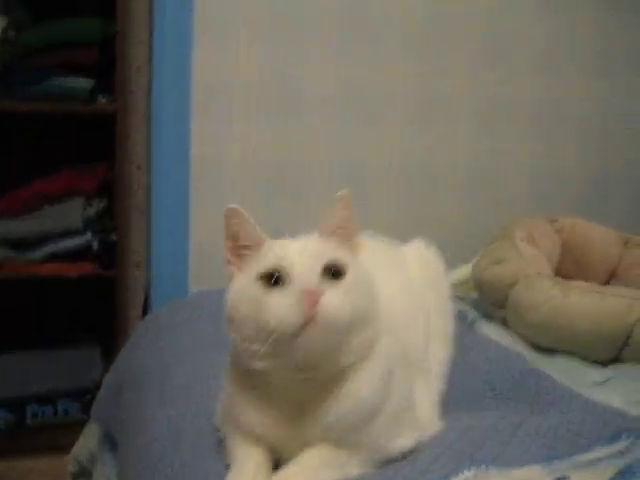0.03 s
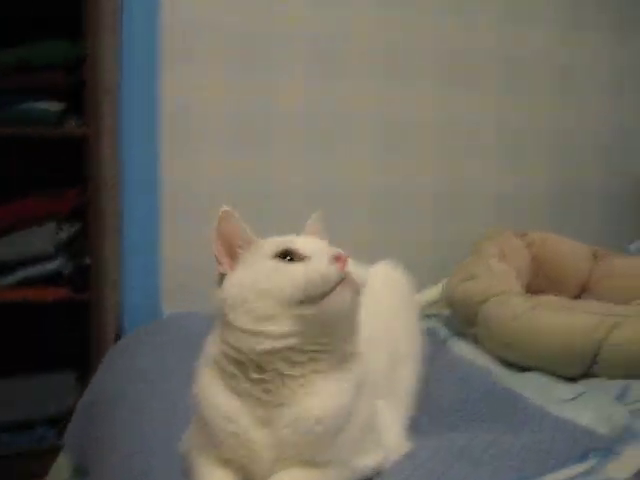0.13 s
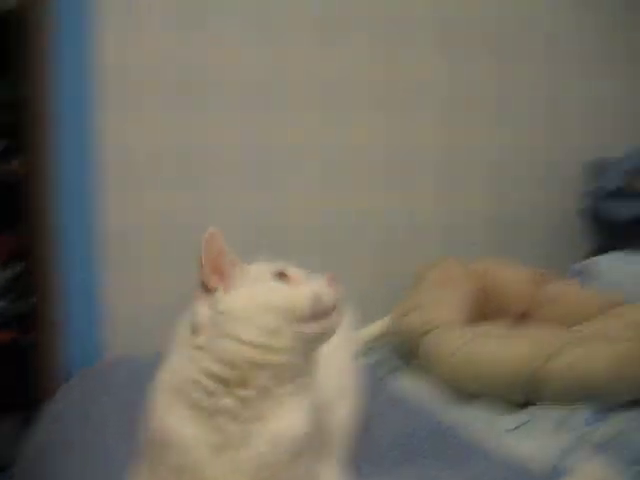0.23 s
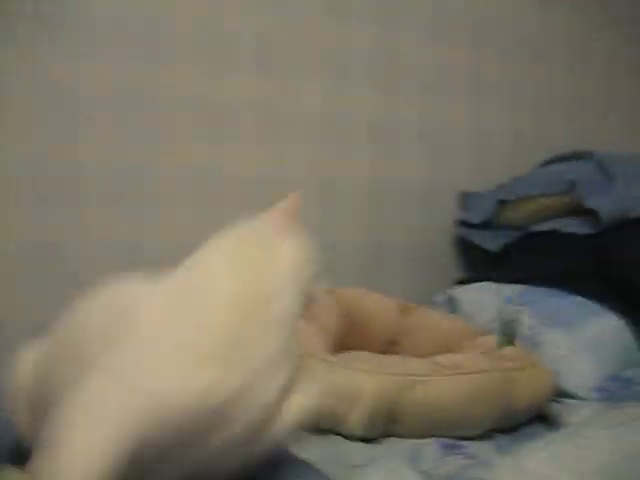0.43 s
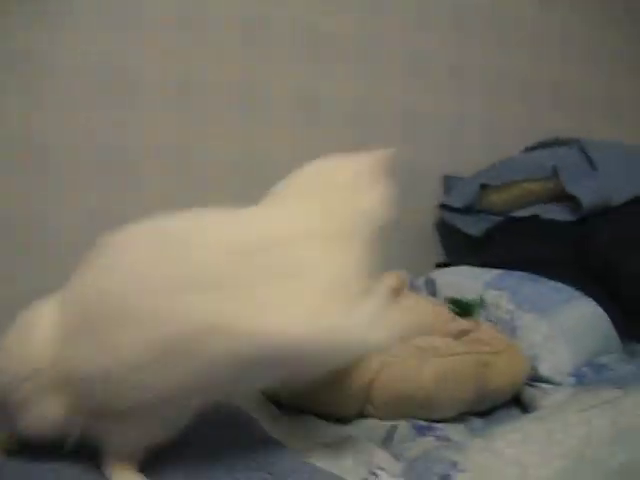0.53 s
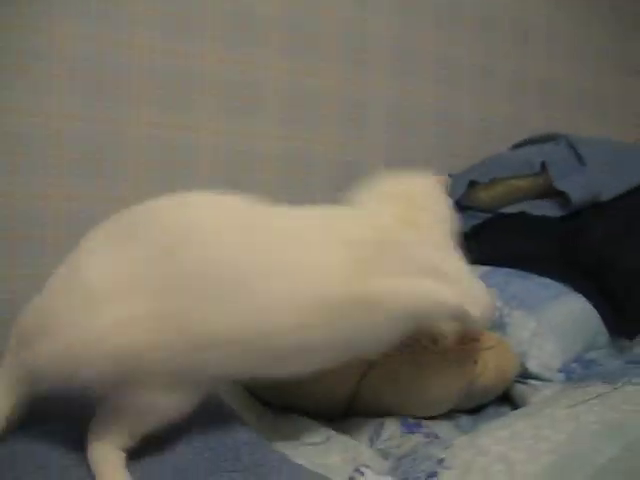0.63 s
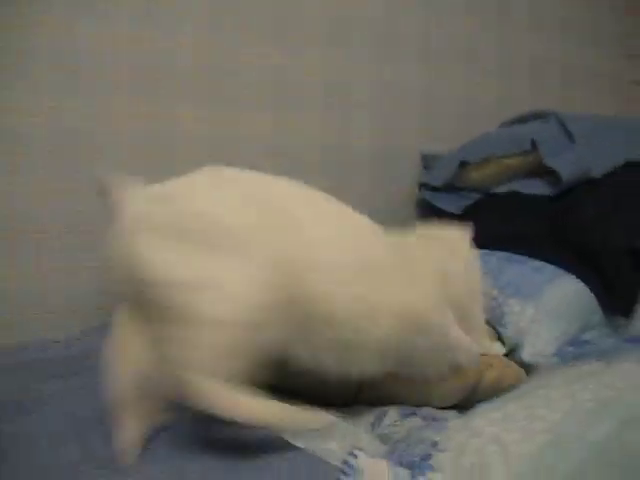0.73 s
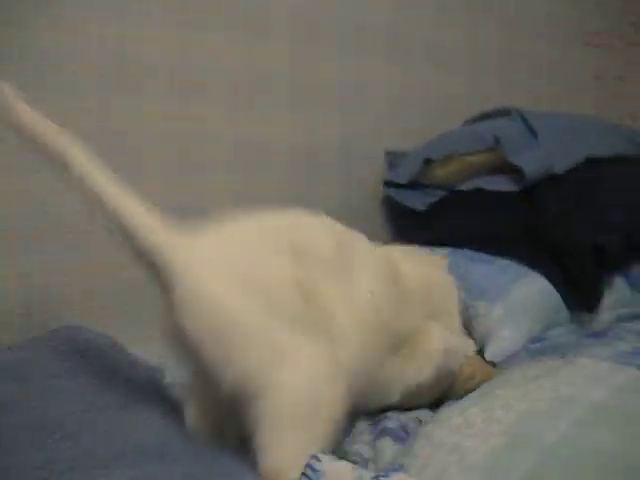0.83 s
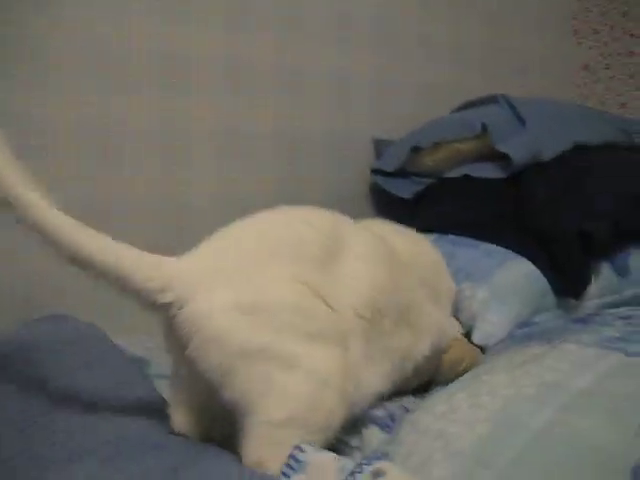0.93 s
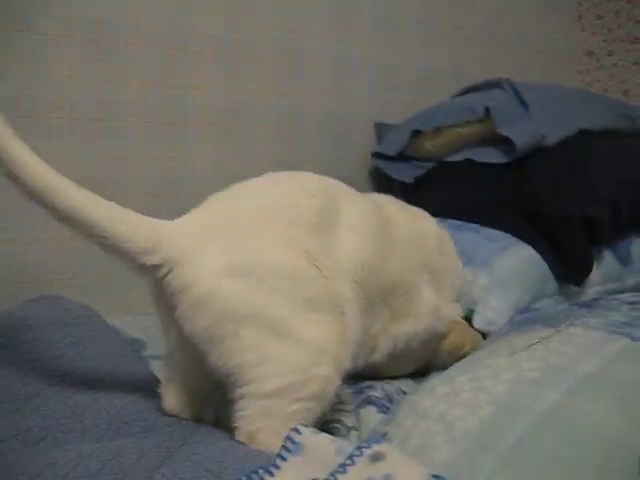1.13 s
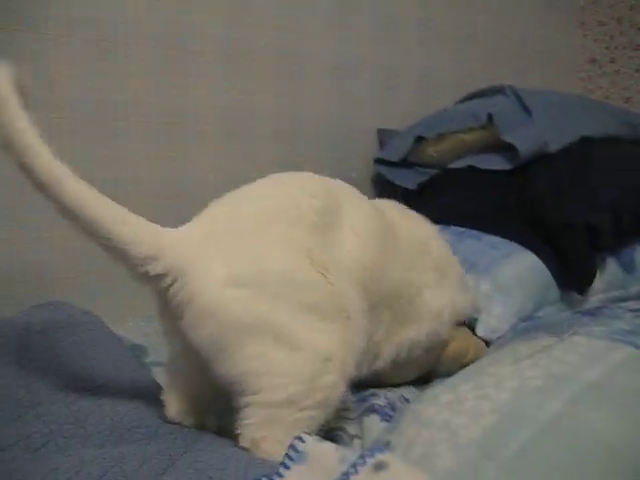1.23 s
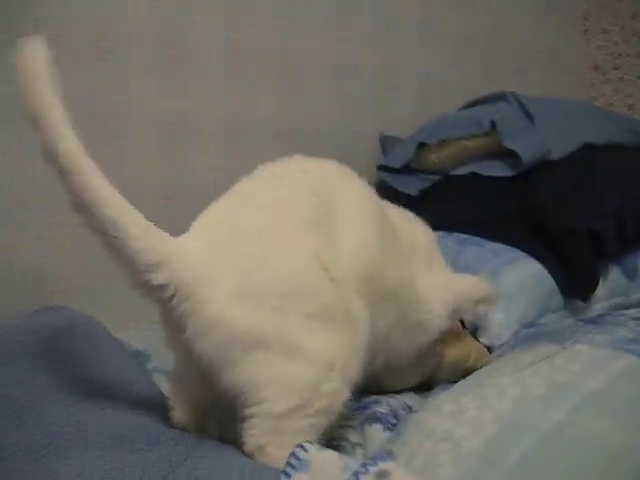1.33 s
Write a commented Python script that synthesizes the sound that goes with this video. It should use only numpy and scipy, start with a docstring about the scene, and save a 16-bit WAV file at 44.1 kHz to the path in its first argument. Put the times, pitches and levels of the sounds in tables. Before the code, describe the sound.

A cat gives a short, rasping trill at about 0.5 seconds, just after a sharp plastic click at 0.2. Its paws thump and rustle softly on bedding, mostly from 0.6 to 0.9 seconds. A second sharp click comes near 1 second, then a faint chirr around 1.3. Steady hiss, a faint high electrical whine and low handling rumble lie underneath in a quiet room.

```python
"""A cat pounces on a bed

A cat turns and pounces in a quiet room, and the bedding thumps and rustles under its paws.
Two sharp clicks ring a small plastic casing. Between them comes a short rasping chirr (a rough trill)
with a few hard catches; a faint chirr comes later. Under it all are a steady hiss, a faint electrical
whine and the low rumble of a hand-held camera following the cat."""
import sys
import numpy as np
from scipy import signal
from scipy.fft import rfft, irfft
from scipy.io import wavfile

SR = 44100
rng = np.random.default_rng(int(sys.argv[2]) if len(sys.argv) > 2 else 0)


def log_audio(samples):
    """Write samples as a 16-bit WAV file to the path given in sys.argv[1]."""
    # one column per channel
    frames = np.atleast_2d(samples).T
    # limit to full scale, then quantise
    limited = np.clip(frames, -1, 1)
    pcm = np.round(limited * 32767).astype(np.int16)
    wavfile.write(sys.argv[1], SR, pcm)


N = 61739

# Tone of the hiss, before its bass is thinned: pitch_hz, level_db
HISS_COLOUR = [(59, -49), (100, 2.5), (232, -6.5), (284, -9), (342, -11), (794, -12), (1020, -14.5),
               (1580, -13), (4000, -14.5), (4650, -13.5), (5600, -19), (7280, -33), (12300, -120)]
# Tones of the electrical whine at full strength: pitch_hz, level_db
WHINE_TONES = [(4702.5, -61.5), (4763, -63), (4822, -66)]
# Light brushes of cloth: peak_s, level_db, width_s, pitch_hz
CLOTH_BRUSHES = [(.01, -45, .033, 3300), (1.114, -52, .004, 2600), (1.19, -52, .018, 2250)]
# Paws and body landing on the bedding: peak_s, level_db, rise_s, fall_s, cutoff_hz
BED_THUMPS = [(0.219, -37.5, .003, 0.0054, 440), (.447, -44, 0.0097, 0.026, 200),
              (0.553, -41, 0.0025, 0.014, 80.7), (0.634, -34, 0.0053, 0.0035, 100),
              (0.674, -50.5, 0.054, 0.06, 486), (0.707, -38.5, 0.014, 0.017, 390),
              (0.761, -37.5, .015, 0.011, 256), (0.807, -35, 0.0064, 0.023, 162),
              (.838, -36, 0.036, 0.042, 237.6), (0.859, -47, 0.023, 0.041, 309)]
# The two clicks: start_s, level_db, pitch_factor, snap_db, tick_db, edge_db
CASING_CLICKS = [(0.2372, -1.1, 0.998, -14.5, -4, -3.5), (1.0451, -1.5, 1.0215, -9, -9, -12)]
# Small bounces after a click, before its pitch factor and level apply: delay_s, level_db, pitch_hz
CLICK_BOUNCES = [(.00312, -6.5, 1220), (.00571, -15.5, 1378), (.00986, -14.5, 1082)]
# Tones the casing rings with: pitch_hz, level_db, ring_s (time to fade by 60 dB)
CASING_TONES = [(685.6, -15.5, 0.036), (854, -12, 0.046), (1004, -15.5, 0.042), (1265, -29, 0.057),
                (1387, -15.5, 0.03), (1500, -42, 0.018), (2003, -24.5, 0.032), (2740, -21, 0.024),
                (3128, -20, 0.025), (4930, -17, 0.011)]
# How the main chirr moves: time_s, level_db, pitch_hz
MAIN_CHIRR_PATH = [(.41, -56, 1300), (.438, -43, 1300), (.452, -31.5, 1150), (.465, -30, 1380),
                   (.486, -29.5, 1180), (.5, -30, 1380), (.526, -27.5, 1220), (.54, -29.5, 930),
                   (.551, -44, 880), (.565, -66, 880)]
# How the later, faint chirr moves: time_s, level_db, pitch_hz
FAINT_CHIRR_PATH = [(1.205, -66, 1500), (1.223, -48, 1400), (1.261, -51, 1250), (1.265, -39, 1120),
                    (1.279, -39, 1020), (1.286, -64, 950)]
# Tone of the hollow body that the chirr's pulses pass through: pitch_hz, level_db
HOLLOW_COLOUR = [(300, -47), (530, -30), (635, -13), (740, -8), (870, -5.5), (1060, -9), (1220, -8),
                 (1450, -7.5), (1750, -11.5), (2050, -20), (2250, -30.5), (2650, -44.5), (3050, -27.5),
                 (3500, -39), (4400, -33.5), (5500, -44)]
# Hard catches in the main chirr: start_s, level_db, pitch_hz, rise_s
CHIRR_CATCHES = [(0.4477, -7.5, 1296, 0.00034), (0.4776, -14, 1330, 0.00062), (.4797, -10, 1278, 0.00033),
                 (0.524, -16, 1210, 0.00055), (0.5278, -13, 1270, 0.00027), (.536, -28.5, 855, 0.0019)]

SNAP_HZ, SNAP_RISE_S = 2973, 0.00047
TICK_HZ, TICK_RISE_S = 4755, 0.00014
KNOCK_HZ, KNOCK_RISE_S = 1429, 0.00035
LEAD_S = 0.000509  # head start of a snap or tick on its knock


def undb(db):
    """Turn decibels into a number to multiply by."""
    return 10 ** (np.asarray(db) / 20)


def since(start):
    """Seconds since a moment, zero before it."""
    return np.maximum(np.arange(N) / SR - start, 0)


def shaped(sound, gain):
    """Filter a sound by a gain for each frequency, then set its average (rms) level to 1."""
    filtered = irfft(rfft(sound) * gain(np.fft.rfftfreq(N, 1 / SR) + 1), N)
    return filtered / np.sqrt(np.mean(filtered ** 2))


def noise(gain):
    """Filtered noise with an average level of 1."""
    return shaped(rng.standard_normal(N), gain)


def colour(points):
    """A filter curve drawn through (pitch_hz, level_db) points."""
    hz, db = np.array(points).T
    return lambda f: undb(np.interp(np.log(f), np.log(hz), db))


def low(hz, order=3):
    """A filter curve that keeps the lows, except those too deep to hear."""
    return lambda f: f / np.hypot(f, 20) / np.hypot(1, (f / hz) ** order)


def band(hz, width_hz):
    """A filter curve that keeps what lies near one pitch."""
    return lambda f: 1 / (1 + ((f - hz) / width_hz) ** 2 * hz / f)


def blip(start, hz, rise):
    """A tone that swells and dies within a few cycles."""
    t = since(start)
    return (t / rise / 2) ** 2 * np.exp(2 - t / rise) * np.sin(2 * np.pi * hz * t)


def hiss(level_db=-51.5):
    """A steady hiss with its deep bass thinned."""
    return undb(level_db) * noise(lambda f: colour(HISS_COLOUR)(f) * f / np.hypot(f, 120))


def whine(rise_db_per_s=6, full_s=1.0):
    """A faint electrical whine: three close tones grow louder, then hold."""
    t = since(0)
    tones = sum(undb(db) * np.sin(2 * np.pi * hz * t) for hz, db in WHINE_TONES)
    return undb(rise_db_per_s * np.minimum(t - full_s, 0)) * tones


def handling_rumble(level_db=-51.5, boost_db=7, pounce_s=0.76, width_s=0.22):
    """Hands on the camera make a rumble that grows as they follow the pounce."""
    swing_db = boost_db * np.exp(-((since(0) - pounce_s) / width_s) ** 2)
    return undb(level_db + swing_db) * noise(low(hz=41.5, order=2))


def cloth_brushes():
    """Cloth is brushed lightly, making short, smooth swells of high noise."""
    t = since(0)
    return sum(undb(db) * np.exp(-((t - peak) / width) ** 2) * noise(band(hz, 0.33 * hz))
               for peak, db, width, hz in CLOTH_BRUSHES)


def bed_thumps(rustle_db=-15.5):
    """Paws and body push into the quilt: each push is a soft thud with a little rustle."""
    t, out = since(0), 0
    for peak, db, rise, fall, cutoff_hz in BED_THUMPS:
        push = np.exp(-np.maximum((peak - t) / rise, (t - peak) / fall))
        thud = noise(low(cutoff_hz, order=4))
        rustle = undb(rustle_db) * noise(low(hz=3000))
        out += undb(db) * push * (thud + rustle)
    return out


def clicks(knock_db=0.02, crackle_db=-21, crackle_s=0.022):
    """Plastic ticks, snaps and knocks, then bounces with a crackle while the casing rings."""
    out = 0
    for start, db, pitch, snap_db, tick_db, _ in CASING_CLICKS:
        tick = undb(tick_db) * blip(start - LEAD_S, TICK_HZ * pitch, TICK_RISE_S)
        snap = undb(snap_db) * blip(start - LEAD_S, SNAP_HZ * pitch, SNAP_RISE_S)
        knock = undb(knock_db) * blip(start, KNOCK_HZ * pitch, KNOCK_RISE_S)
        bounces = sum(undb(bounce_db) * blip(start + delay / pitch, hz * pitch, rise=0.00032)
                      for delay, bounce_db, hz in CLICK_BOUNCES)
        t = since(start)
        fade = (t > 0) * undb(-60 * t / crackle_s)
        crackle = undb(crackle_db) * fade * noise(band(hz=4070, width_hz=1300))
        out += undb(db) * (tick + snap + knock + bounces + crackle + casing_ring(start, pitch))
    return out


def click_edges(cutoff_hz=7900):
    """A single, slightly softened spike gives each click a thin, bright edge."""
    spikes = np.zeros(N)
    for start, *_, edge_db in CASING_CLICKS:
        spikes[int(start * SR)] = undb(edge_db)
    return signal.sosfilt(signal.butter(1, cutoff_hz, fs=SR, output="sos"), spikes)


def casing_ring(start, pitch, delay_s=0.001476, rise_s=0.0013):
    """The casing's own tones build up just after a blow, then die away."""
    t = since(start + delay_s)
    tones = sum(undb(db - 60 * t / ring_s) * np.sin(2 * np.pi * hz * pitch * t)
                for hz, db, ring_s in CASING_TONES)
    return tones * (1 - np.exp(-t / rise_s))


def trailing_tick():
    """A tiny tick follows the first click."""
    return undb(-34) * blip(start=0.2693, hz=1450, rise=KNOCK_RISE_S)


def chirr(path, pulses_per_s=2000, scatter_db=0.5, grains_db=-4, rasp_db=-2.5, rasp_width_hz=178):
    """Quick, uneven pulses through a hollow body, and a rasp whose pitch wavers and finally sinks."""
    t = since(0)
    times, db, hz = np.array(path).T
    pulses = (rng.random(N) < pulses_per_s / SR) * undb(-scatter_db * rng.standard_normal(N))
    grains = shaped(pulses - pulses.mean(), colour(HOLLOW_COLOUR))
    phase = 2 * np.pi * np.cumsum(np.interp(t, times, hz)) / SR
    # Multiplying a tone by slow noise makes it rough.
    rasp = noise(low(rasp_width_hz)) * np.sin(phase) + noise(low(rasp_width_hz)) * np.cos(phase)
    swell = undb(np.interp(t, times, db, left=-np.inf, right=-np.inf))  # silent outside the path
    return (undb(grains_db) * grains + undb(rasp_db) * rasp) * swell


def catches(snap_db=-24.5, tick_db=-25.5):
    """The chirr catches hard: small hollow knocks, each with a little snap and tick."""
    out = 0
    for start, db, hz, rise in CHIRR_CATCHES:
        snap = undb(snap_db) * blip(start - LEAD_S, SNAP_HZ, SNAP_RISE_S)
        tick = undb(tick_db) * blip(start, TICK_HZ, TICK_RISE_S)
        out += undb(db) * (blip(start, hz, rise) + snap + tick)
    return out


def scene(chirr_low_hz=574, mic_top_hz=5700, mic_limit=0.76, fade_in_s=0.004):
    """The microphone flattens the highest peaks and cuts the treble; the bright edges go on top."""
    chirrs = catches() + chirr(MAIN_CHIRR_PATH) + chirr(FAINT_CHIRR_PATH)
    chirrs = signal.sosfilt(signal.butter(4, chirr_low_hz, "high", fs=SR, output="sos"), chirrs)
    mix = chirrs + clicks() + trailing_tick() + bed_thumps() + cloth_brushes()
    mix += hiss() + whine() + handling_rumble()
    mix = np.clip(mix, -mic_limit, mic_limit) * np.minimum(since(0) / fade_in_s, 1)
    dulled = signal.sosfiltfilt(signal.butter(14, mic_top_hz, fs=SR, output="sos"), mix)
    return (dulled + click_edges())[None]


def record(dry):
    """Cut the very highest treble, above 16500 Hz."""
    return signal.sosfiltfilt(signal.butter(14, 16500, fs=SR, output="sos"), dry)


dry = scene()
out = record(dry)
log_audio(out)
```